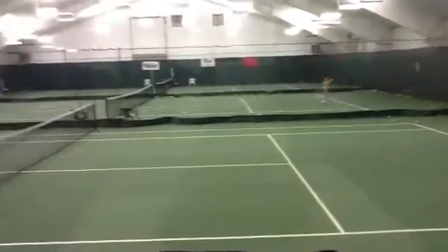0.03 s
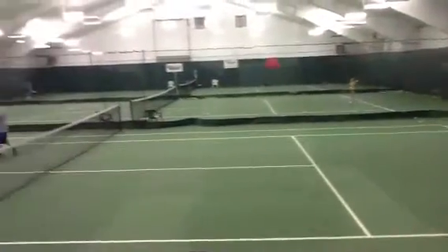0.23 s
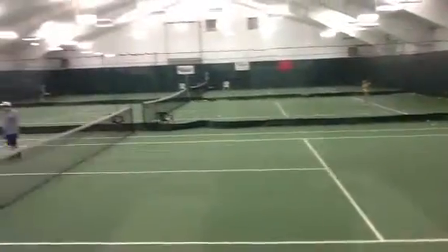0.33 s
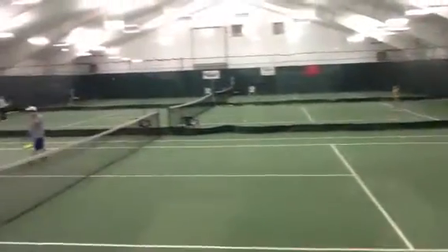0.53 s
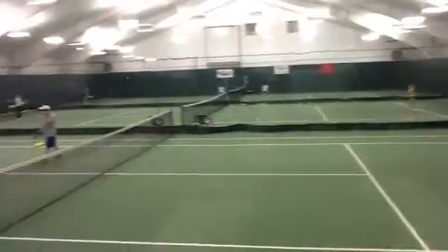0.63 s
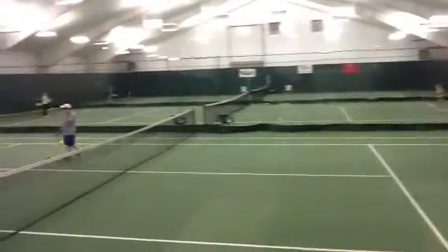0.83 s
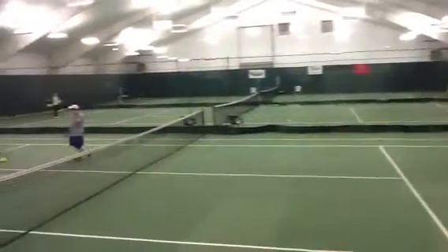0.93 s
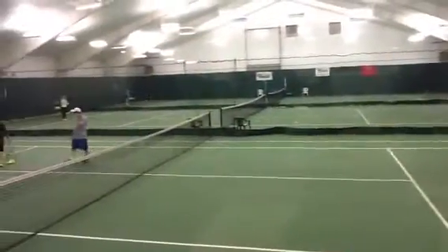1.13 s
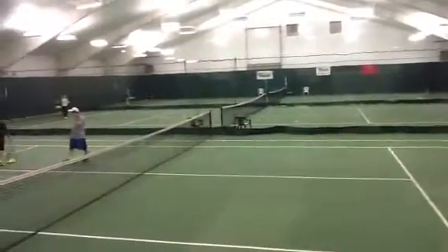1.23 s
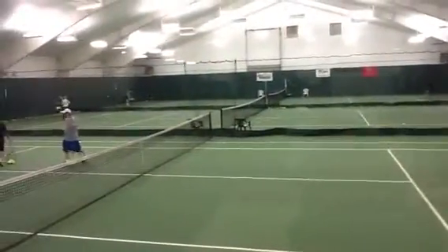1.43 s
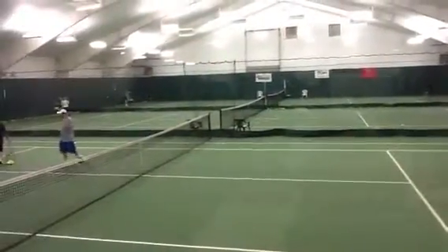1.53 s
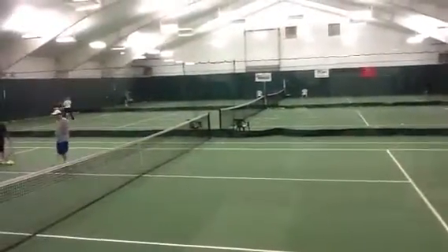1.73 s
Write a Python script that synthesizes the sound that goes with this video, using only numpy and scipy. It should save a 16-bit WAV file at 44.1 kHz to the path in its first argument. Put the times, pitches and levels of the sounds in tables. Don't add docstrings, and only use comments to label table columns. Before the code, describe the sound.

Tennis ball hits knock deep and muffled in an indoor court, with soft bounces and hiss

```python
import sys
import numpy as np
from scipy import signal
from scipy.fft import rfft, irfft
from scipy.io import wavfile

SR = 44100
rng = np.random.default_rng(int(sys.argv[2]) if len(sys.argv) > 2 else 0)


def wrap_up_sound(samples):
    columns = np.atleast_2d(samples).T
    tamed = np.clip(columns, -1, 1)
    steps = np.round(tamed * 32767).astype(np.int16)
    wavfile.write(sys.argv[1], SR, steps)


def level_to_linear(level):
    exponent = np.asarray(level, float) / 20
    return 10 ** exponent


N = 79380
TIME_S = np.arange(N) / SR
WIDTH_MS_TO_SIGMA_S = 1 / 2355


def thump(trough_s, peak_db, pitch_hz, rise_s, fall_s, sag_per_s, late_cycles):
    t = TIME_S - trough_s
    u = t - late_cycles / pitch_hz
    swell = np.exp(-0.5 * (u / np.where(u < 0, rise_s, fall_s)) ** 2)
    cycles = pitch_hz * (1 - np.exp(-sag_per_s * np.clip(t, -0.02, 1))) / sag_per_s
    return -level_to_linear(peak_db) * swell * np.cos(2 * np.pi * cycles)


def even_thumps(events, sag_per_s, late_cycles):
    total = np.zeros(N)
    for s, db, hz, width_ms in events:
        sigma_s = width_ms * WIDTH_MS_TO_SIGMA_S
        total += thump(s, db, hz, sigma_s, sigma_s, sag_per_s, late_cycles)
    return total


# (time [s], peak [dB], pitch [Hz], rise [ms], fall [ms])
STRIKE_KNOCKS = [
    (.2242, -26.4, 181, 2.6, 3.1),
    (.6501, -33, 100, .6, 1.15),
    (.8332, -31.2, 180, 1.7, 1.5),
    (1.6512, -41.5, 212, 1.2, 4.8),
]


def knocks():
    sag_per_s, late_cycles = 78, 0.06
    return sum(thump(s, db, hz, rise_ms / 1000, fall_ms / 1000, sag_per_s, late_cycles)
               for s, db, hz, rise_ms, fall_ms in STRIKE_KNOCKS)


# (time [s], peak [dB], pitch [Hz], rise [ms], fall [ms])
STRIKE_BOOMS = [
    (.2341, -25.9, 113, 4.2, 4.7),
    (.6643, -28.5, 107, 4.0, 4.3),
    (.8459, -28.8, 103, 3.7, 4.1),
]


def booms():
    sag_per_s = 11
    return sum(thump(s, db, hz, rise_ms / 1000, fall_ms / 1000, sag_per_s, 0)
               for s, db, hz, rise_ms, fall_ms in STRIKE_BOOMS)


# (time [s], peak [dB], swell [ms], drop [ms])
CONTACT_EDGES = [
    (0.2224, -42, 1.2, .5),
    (.6491, -42.5, 0.47, 0.76),
    (0.8318, -37.5, 2.2, 1),
    (1.6492, -56, 0.19, 0.55),
]


def contact_edges():
    total = np.zeros(N)
    for s, db, swell_ms, drop_ms in CONTACT_EDGES:
        t_ms = (TIME_S - s) * 1000
        total += level_to_linear(db) * np.exp(-np.abs(t_ms) / np.where(t_ms < 0, swell_ms, drop_ms))
    return total


# (time [s], peak [dB], pitch [Hz], width [ms])
DRY_TICKS = [
    (.4601, -55, 600, .7),
    (.6868, -58, 1800, .35),
]
# (time [s], peak [dB], pitch [Hz], width [ms])
SOFT_RIPPLES = [(.2120, -57, 260, 5.0), (.2183, -50, 500, 2.6), (.2200, -62, 760, 2.0),
                (.4415, -56, 220, 7.0), (.6568, -47, 230, 4.5), (.8323, -53, 580, 2.2),
                (.9955, -55, 200, 6.0), (1.0885, -54, 200, 6.0), (1.6512, -62, 800, .9)]


def ticks():
    return even_thumps(DRY_TICKS + SOFT_RIPPLES, sag_per_s=1, late_cycles=0)


def scuff():
    time_s, level_db, width_ms, low_hz = 0.6618, -57, 2.6, 6500
    high_pass = signal.butter(4, low_hz, "high", fs=SR, output="sos")
    bright = signal.sosfilt(high_pass, rng.standard_normal(N))
    burst = np.exp(-0.5 * ((TIME_S - time_s) / (width_ms * WIDTH_MS_TO_SIGMA_S)) ** 4)
    return level_to_linear(level_db) * bright * burst


# (time [s], peak [dB], pitch [Hz], width [ms])
FAR_BUMPS = [(0.0509, -56, 137, 9.7), (0.1127, -57, 121, 8.3), (0.1514, -45, 131, 10.6),
             (0.3999, -53, 140, 17), (0.486, -49.5, 167, 6.6), (0.5209, -45, 151, 7.9),
             (0.5321, -43, 130, 6.6), (0.5678, -58, 169, 4.9), (0.576, -46, 144, 5.8),
             (0.5889, -39, 133, 9.2), (0.6822, -42.5, 108, 7.6), (0.6963, -43.0, 144, 10.4),
             (0.752, -44.5, 145, 8), (0.808, -58, 115, 8.1), (0.8105, -43.5, 145, 5.6), (0.861, -45, 99, 7),
             (0.8785, -50.6, 135, 4.8), (0.8968, -46, 142, 15), (0.9177, -48.5, 130, 6.1),
             (0.9751, -41.5, 156, 7.4), (1.0755, -44.5, 160, 5.6), (1.0963, -41, 146, 8.3),
             (1.1119, -53, 156, 8.7), (1.129, -42, 173, 9.9), (1.2224, -53.5, 165, 9.9),
             (1.243, -50.5, 189, 7.7), (1.2698, -51.1, 154, 11.4), (1.3924, -49.2, 159.4, 17),
             (1.4073, -50, 163, 15.5), (1.5831, -52.3, 172, 11.3),
             (.010, -56, 156, 5), (0.183, -62, 150, 5), (0.264, -56, 156, 4.2), (.293, -52, 147, 5.5),
               (.317, -55, 177, 7.9), (0.331, -54.5, 161, 12.0), (.353, -52.5, 140, 6),
               (.364, -55.5, 159, 14), (0.428, -53, 157, 14), (0.704, -51, 150, 7.6), (0.726, -66, 165, 13),
               (.944, -57, 145, 16.0), (1.012, -52.5, 110, 14), (1.181, -60, 173, 6.6),
               (1.463, -53.5, 190, 7.3), (1.478, -55, 153, 16), (1.711, -57, 134, 8.0),
               (1.796, -57, 170, 14)]


def bumps():
    return even_thumps(FAR_BUMPS, sag_per_s=14, late_cycles=0.18)


def coloured(x, points):
    hz, db = np.transpose(points)
    f = np.maximum(np.arange(N // 2 + 1) * SR / N, 1)
    gain_db = np.interp(np.log(f), np.log(hz), db)
    gain_db -= 8.3 * np.maximum(np.log2(hz[0] / f), 0)
    y = irfft(rfft(x) * level_to_linear(gain_db), N)
    return y / np.sqrt(np.mean(y ** 2))


# (time [s], level [dB])
RUMBLE_LEVEL = [(0.0, -64), (0.11, -60), (0.3, -63.5), (0.752, -62.5), (1.052, -63), (1.198, -64),
                (1.474, -66.5), (1.8, -64)]
# (frequency [Hz], density [dB per Hz])
RUMBLE_SPECTRUM = [(15, -61), (25, -28), (54, -4), (113, -8.5), (129, -2.5), (149, -2), (199, -9),
                   (303, -15), (800, -30.5), (1040, -44), (1760, -120)]


def rumble():
    pushes_per_s, spread_db, push_top_hz, smooth_share = 300, 3, 341, 0.71
    sizes = level_to_linear(spread_db * np.minimum(rng.exponential(1, N), 3)) * rng.choice([-1, 1], N)
    happens = rng.random(N) < pushes_per_s / SR
    low_pass = signal.butter(2, push_top_hz, fs=SR, output="sos")
    pushes = signal.sosfilt(low_pass, sizes * happens + 1e-18)
    lumps = coloured(pushes, RUMBLE_SPECTRUM + [(1600, -77)])
    smooth = coloured(rng.standard_normal(N), RUMBLE_SPECTRUM + [(1600, -89)])
    s, db = np.transpose(RUMBLE_LEVEL)
    mix = smooth_share * smooth + np.sqrt(1 - smooth_share ** 2) * lumps
    return level_to_linear(np.interp(TIME_S, s, db)) * mix


# (frequency [Hz], density [dB per Hz])
HISS_SPECTRUM = [(300, -0.27), (500, 0.87), (800, 0.78), (1300, 0.3), (2500, -1.14), (5000, -1.7),
                 (9000, -1.66), (15000, -1.33)]


def hiss():
    level_db, wander_db, wander_hz = -67, 0.25, 5
    even = coloured(rng.standard_normal(N), HISS_SPECTRUM)
    steps = rng.standard_normal(40)
    wander = np.interp(TIME_S * 2 * wander_hz, np.arange(len(steps)), steps)
    return level_to_linear(level_db + wander_db * wander) * even


def scene():
    strikes = knocks() + booms() + contact_edges()
    return (strikes + ticks() + scuff() + bumps() + rumble() + hiss())[None]


def band_limit(x):
    return signal.sosfilt(signal.butter(12, 15200, fs=SR, output="sos"), x)


def record(dry):
    low_cut = signal.butter(2, 32.4, "high", fs=SR, output="sos")
    mix = signal.sosfiltfilt(low_cut, dry)
    return band_limit(mix)


dry = scene()
out = record(dry)
wrap_up_sound(out)
```